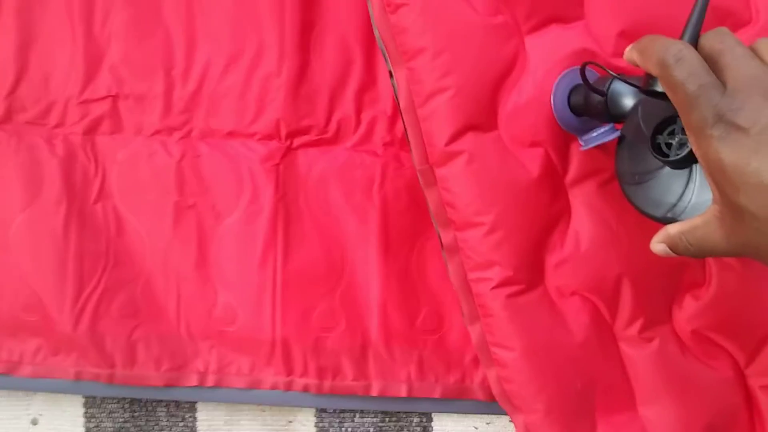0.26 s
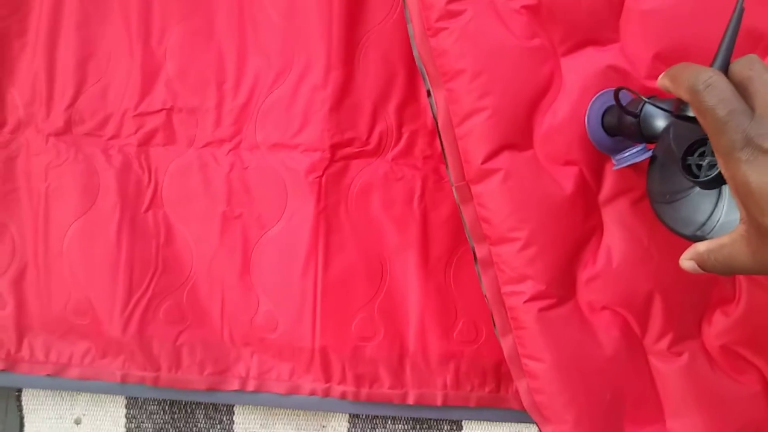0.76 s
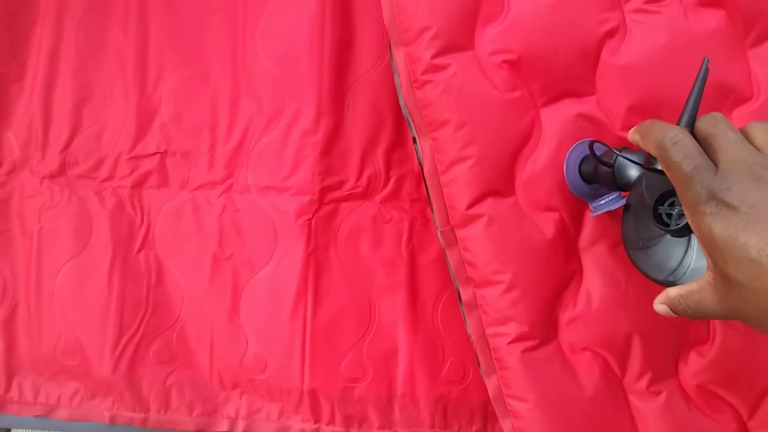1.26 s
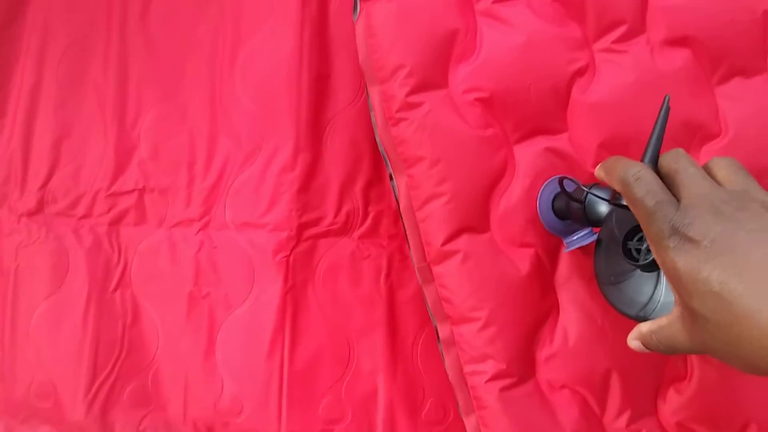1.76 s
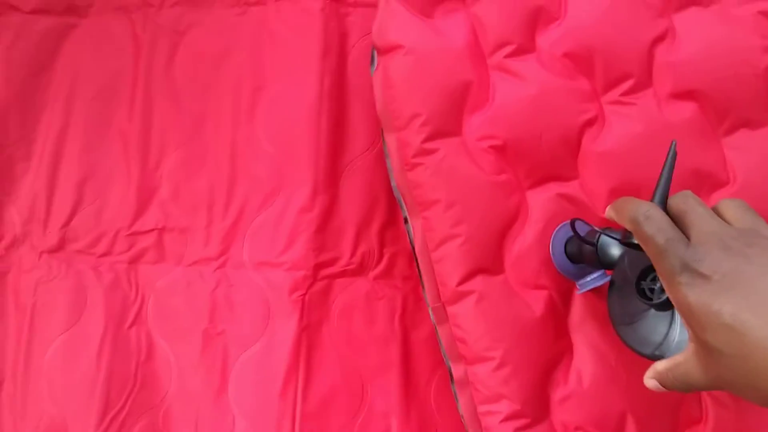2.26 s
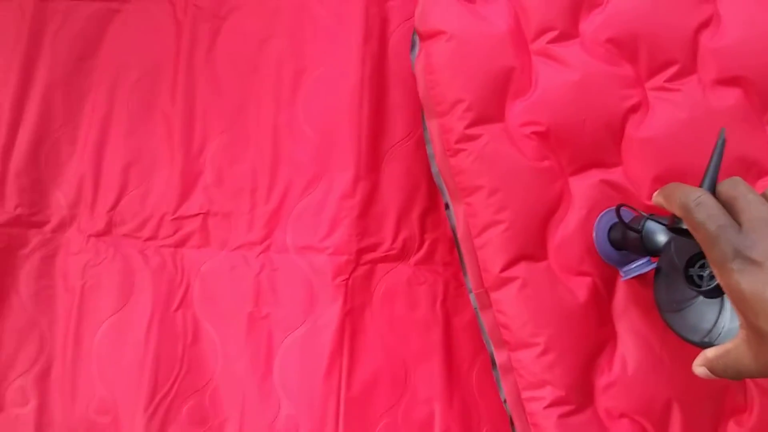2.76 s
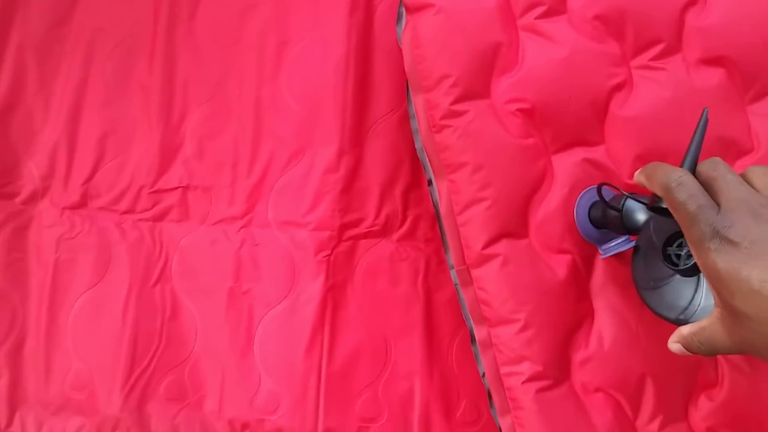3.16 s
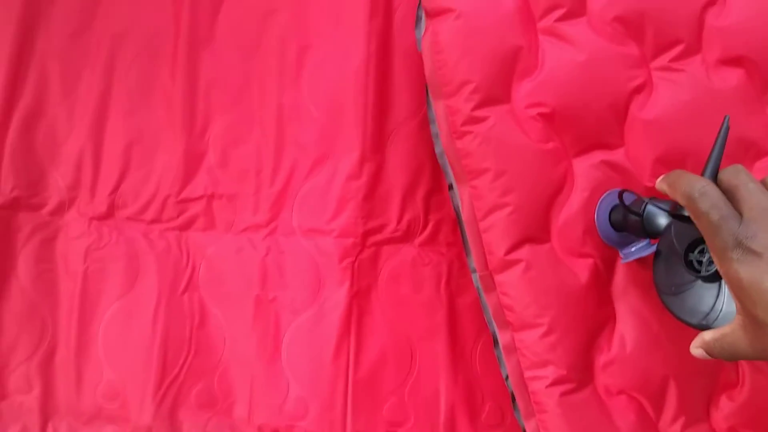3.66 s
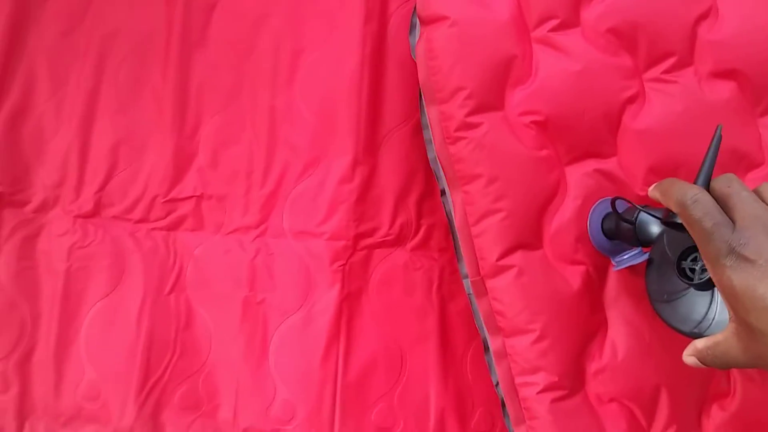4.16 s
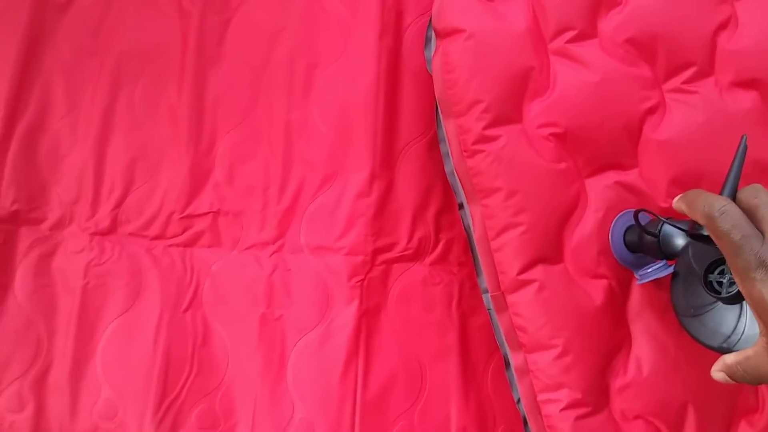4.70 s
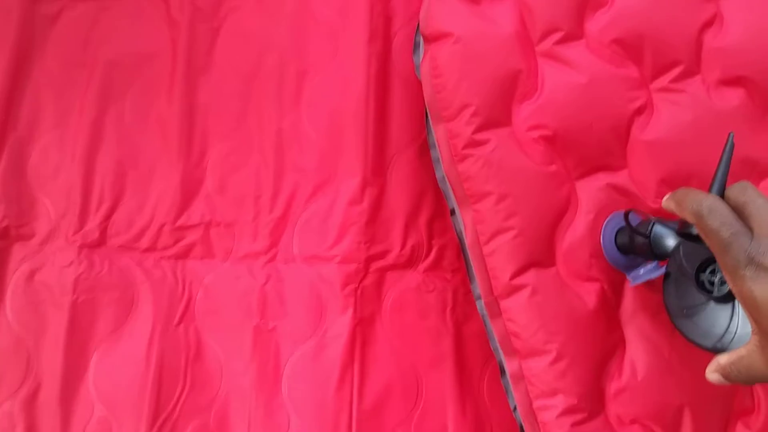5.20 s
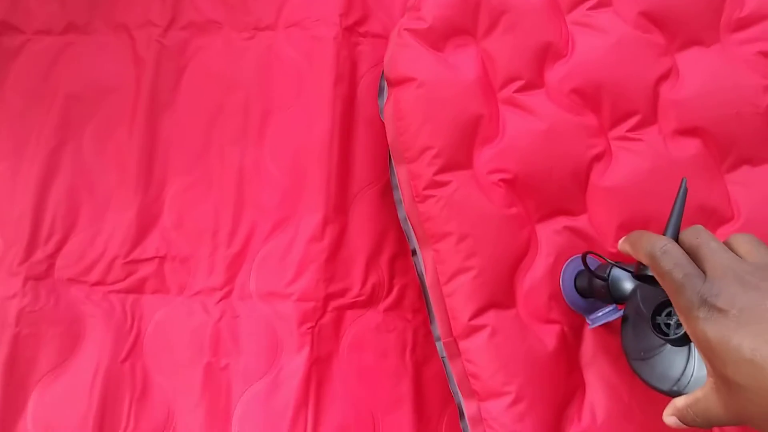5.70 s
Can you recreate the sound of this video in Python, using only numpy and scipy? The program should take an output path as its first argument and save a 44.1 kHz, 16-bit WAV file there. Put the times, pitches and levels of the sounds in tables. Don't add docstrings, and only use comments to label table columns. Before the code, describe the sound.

Already running at the start and still running at the end, a small blower motor whines over rough, hollow airflow through a plastic nozzle. It slows by a hair as the mat fills, then stays constant. High whistling tones swell and fade gently as the phone moves. Close mono phone pickup, slight room coloration, little deep bass, and one very faint low nudge just before the end.

```python
import sys
import numpy as np
from scipy import signal
from scipy.fft import rfft, irfft, next_fast_len
from scipy.io import wavfile
from scipy.ndimage import uniform_filter1d, map_coordinates

SR = 44100
rng = np.random.default_rng(int(sys.argv[2]) if len(sys.argv) > 2 else 0)


def convert_level_to_amplitude(level_db):
    exponent = np.asarray(level_db, float) / 20
    return 10 ** exponent


def log_audio(samples):
    frames = np.atleast_2d(samples).T
    limited = np.clip(frames, -1, 1)
    pcm = np.round(limited * 32767).astype(np.int16)
    wavfile.write(sys.argv[1], SR, pcm)


N = 261954
BLOCK = 64

# (time [s], shaft rate [Hz])
SPEED = [(0.0, 228.34), (0.2, 229.32), (0.4, 229.84), (0.6, 229.57), (1.2, 227.87), (1.6, 226.52),
         (2.0, 225.48), (2.2, 225.22), (2.8, 224.78), (3.2, 224.53), (3.6, 224.57), (4.0, 224.39),
         (4.5, 224.48), (4.8, 224.43), (5.94, 224.52)]


def unit(x):
    return x / np.sqrt(np.mean(x ** 2) + 1e-20)


def along(points, hz):
    f, v = np.transpose(points)
    return np.interp(np.log(hz + 1), np.log(f + 1), v)


def curves(rows):
    s, *cols = np.transpose(rows)
    return [np.interp(np.arange(N) / SR, s, c) for c in cols]


def wobble(rate_hz, count=1):
    knots = rng.standard_normal((count, int(N * rate_hz / SR) + 4))
    at = np.arange(0, N + BLOCK, BLOCK) * rate_hz / SR
    return np.array([map_coordinates(k, [at]) for k in knots])


def spread(blocks):
    return np.interp(np.arange(N), np.arange(len(blocks)) * BLOCK, blocks)


def filtered(x, response):
    m = next_fast_len(N + SR // 2)
    gain = response(np.fft.rfftfreq(m, 1 / SR))
    return irfft(rfft(x, m) * gain, m)[..., :N]


def bumps(rows, hz):
    return convert_level_to_amplitude(sum(db * np.exp(-2 * (2 * (hz - c) / w) ** 2) for c, w, db in rows))


def shaft_angle():
    hunting_hz = 0.035 * spread(wobble(12)[0])
    return 2 * np.pi * np.cumsum(curves(SPEED)[0] + hunting_hz) / SR


def rotor(angle):
    # (order, running free [dB], loaded [dB])
    shaft = [(1, -55.9, -56.7), (2, -59.7, -59.1), (3, -50.5, -56.2), (4, -34.7, -37.1), (5, -51.3, -54.1),
             (6, -36.2, -34.3), (7, -32.7, -28.0), (8, -36.7, -45.9), (9, -54.5, -52.0), (10, -59.2, -59.7),
             (11, -54.1, -60.0), (12, -50.7, -48.2), (13, -45.4, -38.9), (14, -49.9, -49.3),
             (15, -47.4, -48.0), (16, -44.1, -45.2), (17, -40.5, -52.0), (18, -59.0, -65.7),
             (19, -50.4, -49.0), (20, -54.1, -58.9), (21, -55.7, -67.5), (22, -54.5, -55.6),
             (23, -59.8, -55.4), (24, -56.9, -54.3), (25, -50.2, -60.4), (26, -42.4, -34.7),
             (27, -61.5, -65.6), (28, -64.2, -69.8), (33, -57.2, -75.8), (34, -64.2, -73.5)]
    # (order, running free [dB], loaded [dB])
    brush = [(29, -73.0, -75.7), (35, -74.2, -72.3), (36, -84.7, -80.6), (37, -77.2, -83.1),
             (38, -72.6, -74.6), (39, -63.9, -74.9), (40, -82.4, -74.8), (43, -87.9, -82.7),
             (44, -79.8, -77.1), (45, -83.4, -79.3), (46, -81.2, -83.5), (48, -90.3, -82.5),
             (49, -85.7, -85.8), (50, -92.0, -80.1), (51, -88.7, -79.7), (52, -78.5, -78.9),
             (53, -82.3, -90.1), (54, -81.6, -92.2), (55, -78.3, -85.5), (56, -91.7, -75.8),
             (57, -94.9, -85.5), (58, -90.1, -89.1), (60, -87.7, -90.4), (61, -93.0, -89.2),
             (62, -89.8, -85.2), (63, -84.0, -88.8), (64, -89.8, -86.7), (65, -80.2, -82.7),
             (67, -84.8, -85.6), (68, -92.0, -92.6)]
    # (time [s], center [Hz], lift [dB], length [s])
    shifts = [(0, 5940, -12, 0.15), (.3, 918, -1.5, 0.18), (.7, 2980, -8.4, 0.23), (.85, 5950, -9, 0.18),
              (1.2, 1595, 4.5, 0.48), (1.2, 2735, -4, .3), (1.25, 3870, -6, 0.2), (1.25, 4780, 9, 0.68),
              (1.4, 5225, -8, 0.4), (1.4, 1360, 0.5, 0.34), (1.7, 2940, -6, 0.23), (1.95, 1580, -3.5, 0.43),
              (2.1, 5860, -9, 0.25), (2.15, 4955, -6, 0.82), (2.2, 900, -3.5, 0.89), (2.5, 4725, 19, 1),
              (2.6, 2700, -8, 1), (2.6, 5400, -16, .9), (2.6, 8320, 14, .9), (2.75, 4495, 11, 0.55),
              (3.65, 3815, 5, .65), (3.65, 4490, -8, .65), (3.7, 4265, -10, 0.82), (3.75, 2920, -9.5, 0.59),
              (3.75, 5390, -8.6, .45), (4.6, 3590, -10, 0.63), (4.7, 4715, 18, 1), (5.15, 3140, -17, 0.52),
              (5.35, 2920, -5, 0.23), (5.7, 5835, -2, 0.23)]
    shift_width_hz = 110
    free_hz, loaded_hz, spin_up_s = 229.84, 224.47, 0.4
    steady_db, swell_depth = -52.5, 0.35

    t = np.arange(0, N + BLOCK, BLOCK) / SR
    speed_hz = np.interp(t, *np.transpose(SPEED))
    load = (t > spin_up_s) * (free_hz - speed_hz) / (free_hz - loaded_hz)
    lines = [*shaft, *brush]
    slow = wobble(1.33, count=len(lines))
    fast = wobble(9, count=len(lines))
    start = rng.uniform(0, 2 * np.pi, len(lines))
    out = np.zeros(N)
    for i, (order, free_db, loaded_db) in enumerate(lines):
        db = free_db + load * (loaded_db - free_db)
        reflection_db = np.zeros(len(t))
        for s, hz, lift_db, length_s in shifts:
            near_time = 2 * ((t - s) / length_s) ** 2
            near_pitch = ((order * speed_hz - hz) / shift_width_hz) ** 2
            reflection_db += lift_db * np.exp(-near_time - near_pitch)
        faintness = np.clip((steady_db - max(free_db, loaded_db)) / 10, 0, 1)
        depth = swell_depth * faintness * (order > 1)
        level = spread(convert_level_to_amplitude(db + reflection_db) * (1 + depth * slow[i] + 0.033 * fast[i]))
        phase = start[i] - 0.53 * order ** 2
        out += np.sqrt(2) * level * np.sin(order * angle + phase)
    return out


def air():
    # (time [s], level [dB])
    roar = [(0.0, -30), (0.35, -30), (1.4, -31), (2.02, -33), (3.8, -30.5), (4.12, -32.5), (4.33, -31),
            (4.4, -33.5), (4.6, -32), (5.24, -33), (5.51, -31.5), (5.94, -33.5)]
    # (frequency [Hz], density [dB per Hz])
    flow_spectrum = [(120, -61.5), (190, -45), (240, -27), (400, -18), (560, -11.5), (1100, -11),
                     (2300, -18), (3000, -20), (4000, -20), (5900, -20), (6800, -36), (8000, -38),
                     (11000, -43.5), (15700, -50)]
    # (center [Hz], width [Hz], level [dB])
    housing = [(616, 110, -5), (900, 370, -9), (1683, 570, 1), (1980, 193, -5.5), (2598, 230, -10),
               (3245, 154, -11), (3418, 83, -5.5), (4330, 180, -16), (4830, 490, -24.5), (8420, 300, -35.5)]
    mean_db = -30.5

    roar_db, = curves(roar)
    body_db = 0.36 + (1 - 0.31) * (mean_db - roar_db)
    hiss_db = 0.5 + (1 - 0.25) * (mean_db - roar_db)

    def patches(shape, bins, frames):
        field = uniform_filter1d(rng.standard_normal(shape), size=bins, axis=0)
        return unit(uniform_filter1d(field, size=frames, axis=1))

    z = signal.stft(rng.standard_normal(N), nperseg=512)[2]
    patch_db = 0.5 * patches(z.shape, 5, 20)
    drift_db = 0.27 * patches(z.shape, 3, 120)
    flow = signal.istft(z * convert_level_to_amplitude(patch_db + drift_db), nperseg=512)[1][:N]

    def color(f):
        peaks = sum(convert_level_to_amplitude(2 * db) / (1 + (2 * (f - c) / w) ** 2) ** 2 for c, w, db in housing)
        return np.sqrt(convert_level_to_amplitude(2 * along(flow_spectrum, f)) + peaks * (f > 300))

    rush = unit(filtered(flow, color))
    body = filtered(rush, lambda f: 1 / (1 + (f / 1200) ** 6))
    hiss = filtered(rush, lambda f: 1 / (1 + (2400 / (f + 1)) ** 8))
    mix = rush + (convert_level_to_amplitude(body_db) - 1) * body + (convert_level_to_amplitude(hiss_db) - 1) * hiss
    return convert_level_to_amplitude(roar_db + 1.5) * mix


def reflected(x):
    # (center [Hz], width [Hz], level [dB])
    modes = [(422, 27, -5.5), (734, 33, -1.5), (760, 43, 5.5), (835, 34, 2), (965, 71, -0.5), (1043, 64, 4),
             (1076, 57, -2.5), (1128, 57, -5.5), (1266, 27, 0.5), (1367, 38, -0.5), (1402, 28, -9.5)]
    # (center [Hz], width [Hz], first colour [dB], second colour [dB])
    shade = [(2460, 170, -1.5, -3), (3030, 130, -5, -6), (3720, 160, 2, 5), (4160, 200, 2, -3),
             (4840, 780, -2.5, 2), (5230, 180, -3, -0.5), (5580, 440, 5.5, -5.5), (7220, 260, 1, -24),
             (7770, 600, -3, -3), (8760, 200, -6, 0), (10700, 660, -1, -1.5), (11700, 660, -2, -8),
             (12700, 400, 3, -5), (13700, 800, 0, 1)]
    # (time [s], blend from first to second colour [0-1])
    hold = [
        (0, 0),
        (1, 0.2),
        (2, 1),
        (3.2, 0.7),
        (4, 1),
        (5.94, 0.8),
    ]
    x = filtered(x, lambda f: bumps(modes, f))
    first = filtered(x, lambda f: bumps([(c, w, db) for c, w, db, _ in shade], f))
    second = filtered(x, lambda f: bumps([(c, w, db) for c, w, _, db in shade], f))
    turn = np.clip(curves(hold)[0], 0, 1)
    return first + turn * (second - first)


def handling():
    # (time [s], level [dB], pitch [Hz], length [s])
    pushes = [
        (5.775, -62, 167, 0.023),
        (5.78, -78, 90, .02),
    ]
    t = np.arange(N) / SR
    out = np.zeros(N)
    for s, db, hz, length_s in pushes:
        envelope = np.exp(-((t - s) / length_s) ** 2 * 4)
        out += convert_level_to_amplitude(db) * envelope * np.sin(2 * np.pi * hz * t)
    return out


def scene():
    angle = shaft_angle()
    return (rotor(angle) + reflected(air()) + handling())[None]


def low_pass(x):
    return signal.sosfilt(signal.butter(12, 15720, fs=SR, output="sos"), x)


def record(dry):
    # (center [Hz], width [Hz], depth [dB])
    port = [(7170, 400, 23), (9460, 390, 11)]
    x = filtered(dry, lambda f: 1 / bumps(port, f))
    self_noise = filtered(rng.standard_normal(dry.shape), lambda f: f < 2000)
    return low_pass(x + convert_level_to_amplitude(-89) * self_noise)


dry = scene()
out = record(dry)
log_audio(out)
```